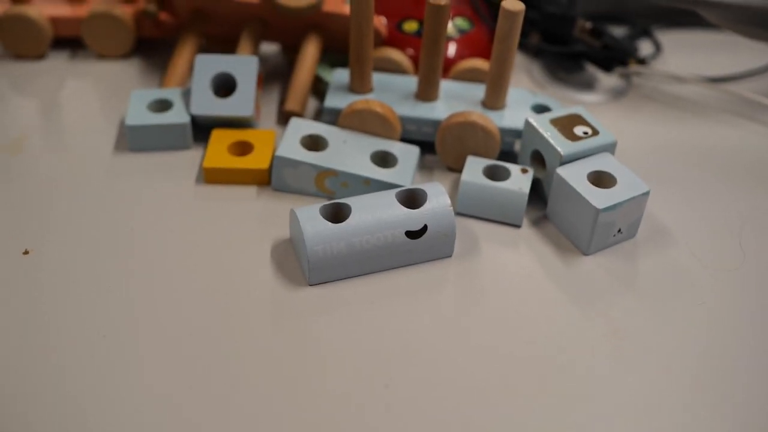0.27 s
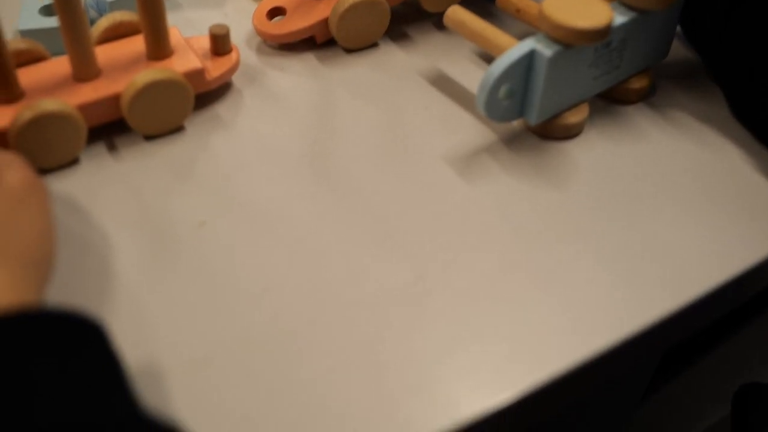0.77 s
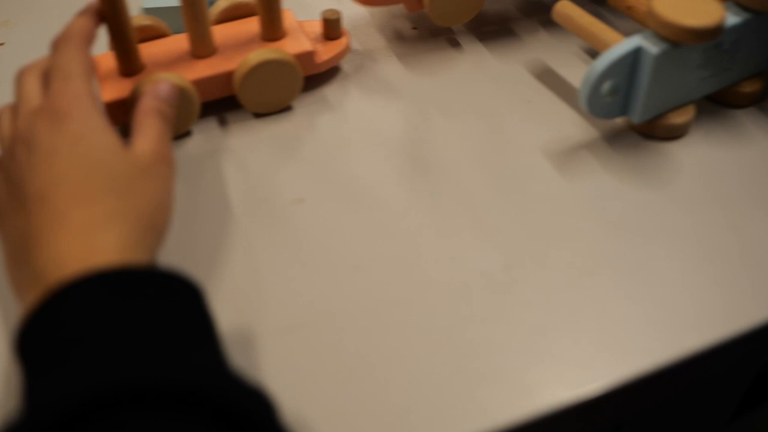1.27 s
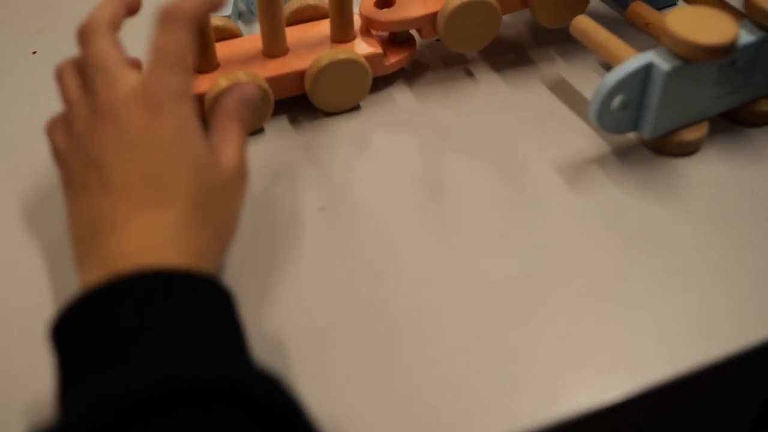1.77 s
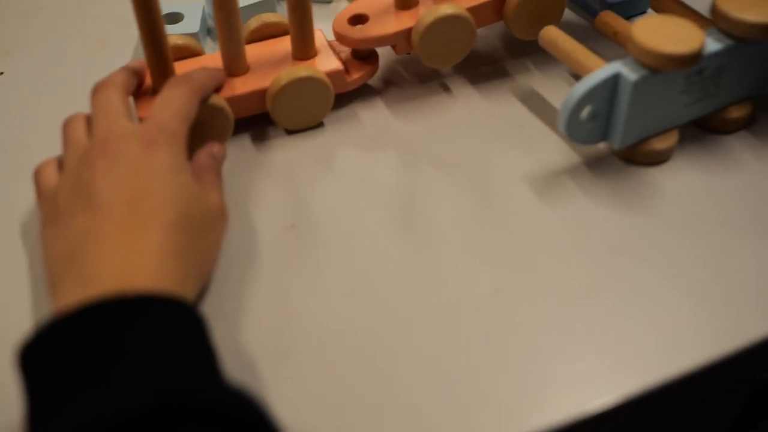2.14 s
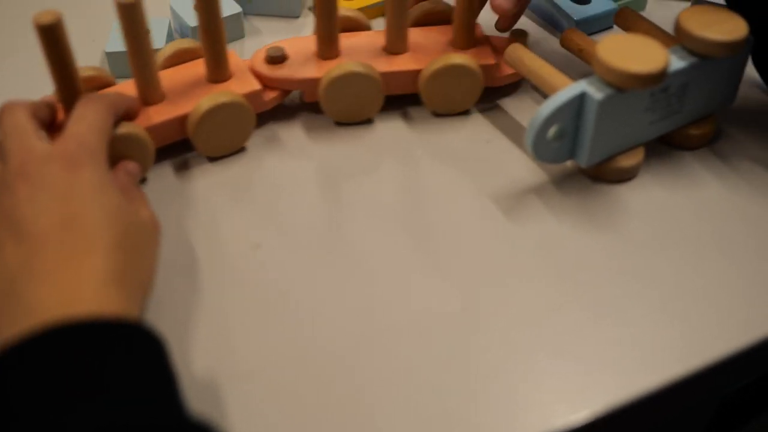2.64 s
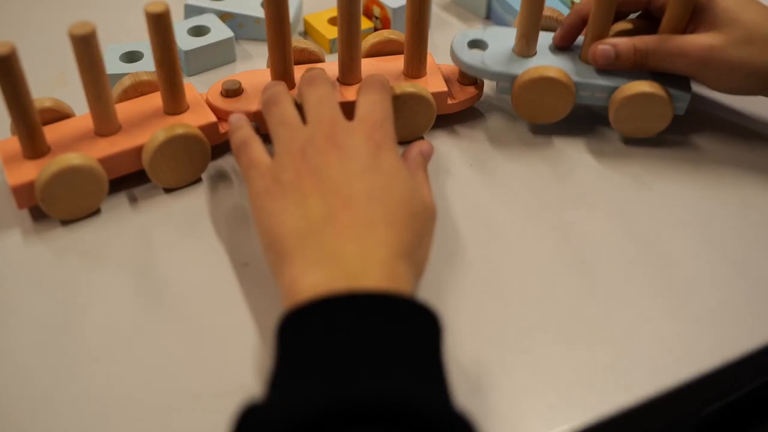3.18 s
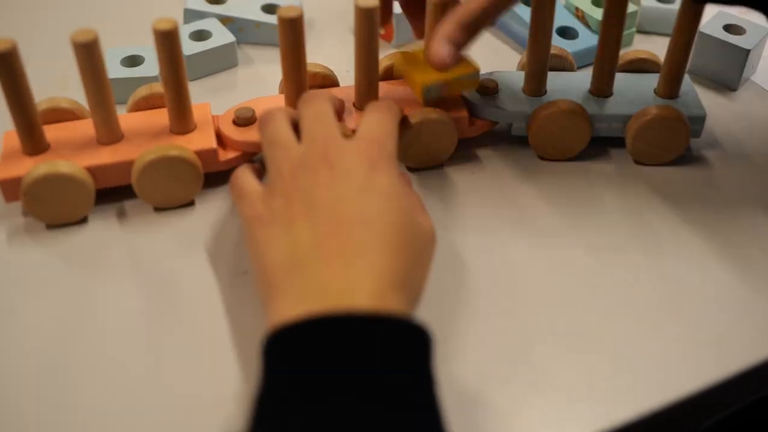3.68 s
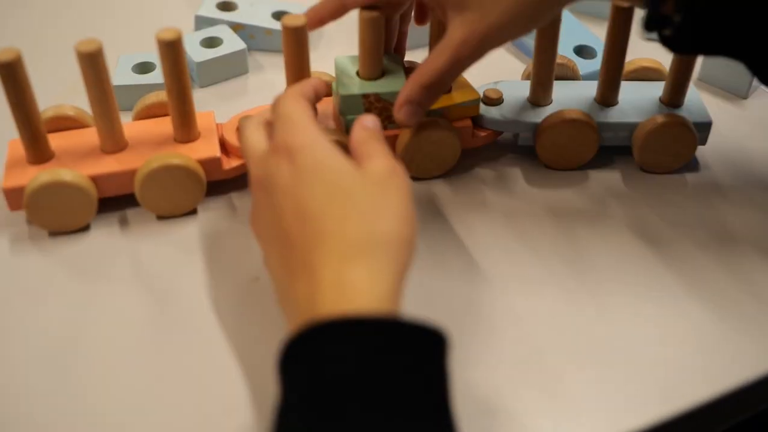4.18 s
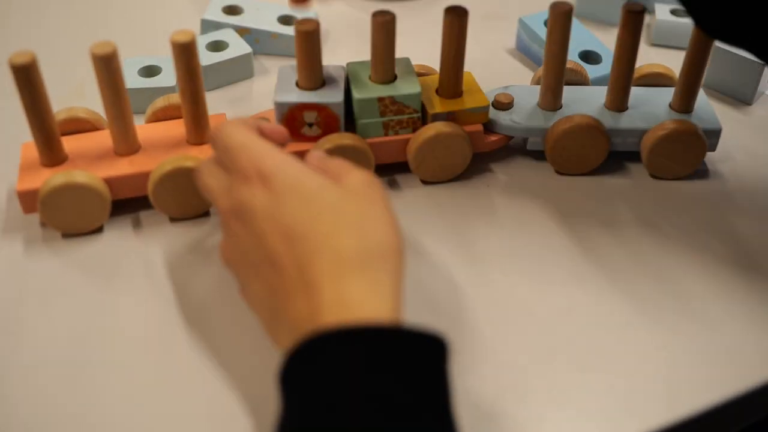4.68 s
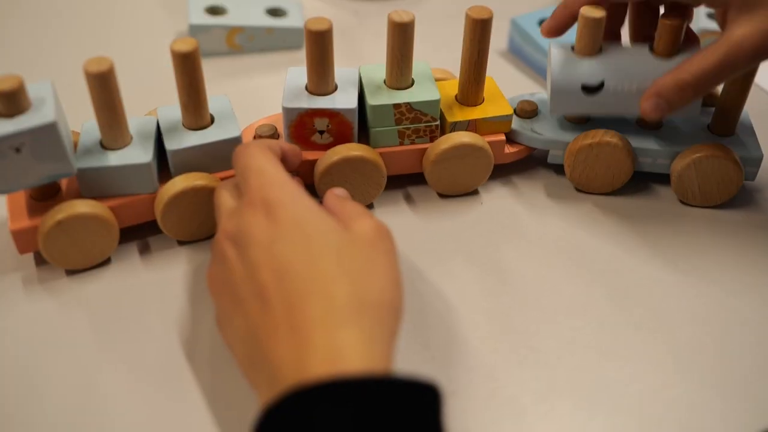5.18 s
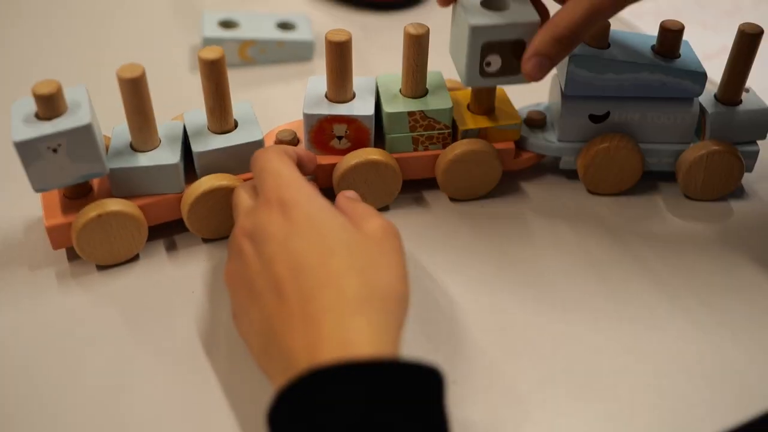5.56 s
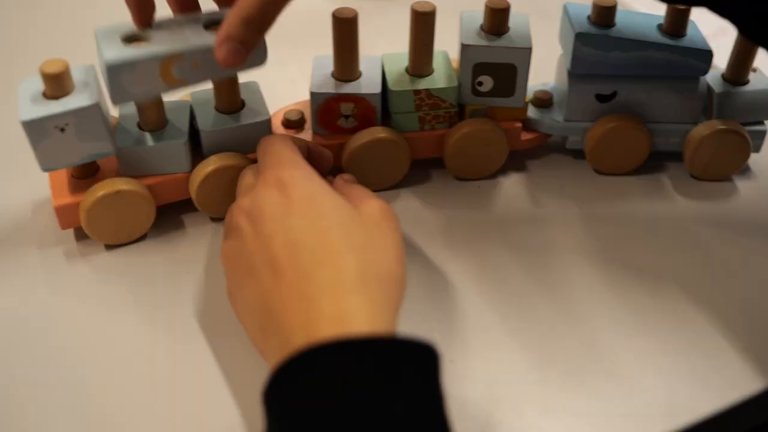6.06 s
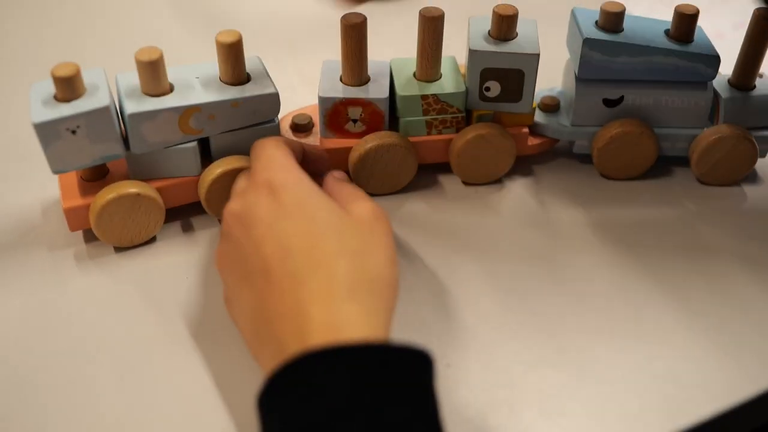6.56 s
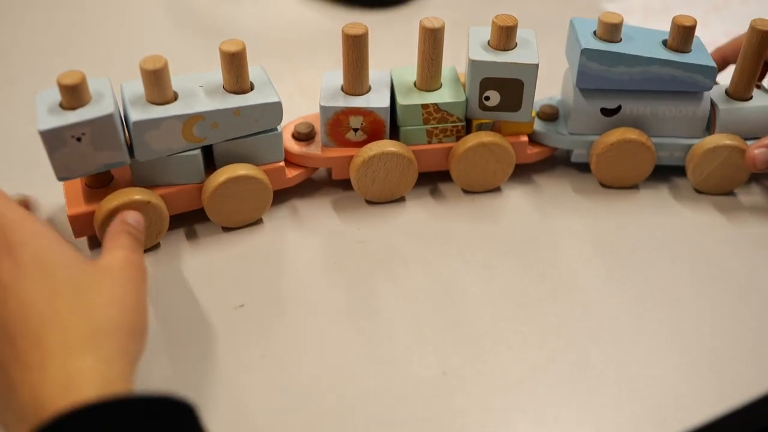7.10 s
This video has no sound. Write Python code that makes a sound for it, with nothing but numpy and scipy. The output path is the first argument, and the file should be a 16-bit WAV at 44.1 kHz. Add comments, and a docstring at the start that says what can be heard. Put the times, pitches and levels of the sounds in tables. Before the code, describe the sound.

A quiet indoor room with steady low ventilation rumble, faint hum and airy hiss, heard close to a tabletop. At the very start there is a tiny crackling click; around 0.5-1.0 s small ticks, soft sleeve brushing and dull, faint table bumps. A light wooden tap comes at 1.8 s and a hollow knock at 2.06 s. Wagons couple with quick knocks around 2.5 s, then a loud, dense clatter at 2.7-2.8 s. Softer coupling taps follow at 3.2-3.55 s. Blocks land with crisp, bright clacks at 3.84, 4.3 and 4.7 s, the last a rapid double hit. Light scuffs lead to a faint wavering rub-squeak from 5.14 s, ending in a solid woody clack at 5.36 s. A loud, sharp clack strikes at 5.77 s, another at 6.25 s, each with short room echo. Soft brushing and one tiny tap near 7.2 s close it.

```python
"""Tiny clicks, dragging crackles and soft brushing over a low rumble open the scene in a quiet room.
Then a wooden toy train clatters together: wagons are nudged and coupled, blocks slide down pegs and clack.
Each contact is damped noise plus ringing modes, and thumps the modes of the table top.
Catches through resonances squeak on the pegs; noise bursts scuff; decaying noise makes the room's echoes.
Shaped noise and a wavering two-tone hum form the ventilation bed."""
import sys
import numpy as np
from scipy import signal
from scipy.fft import rfft, irfft, next_fast_len
from scipy.io import wavfile
from scipy.ndimage import uniform_filter1d, minimum_filter1d, map_coordinates

SR = 44100
rng = np.random.default_rng(int(sys.argv[2]) if len(sys.argv) > 2 else 0)


def waveform_to_disk(signal):
    """Save audio, clipped to [-1, 1], as 16-bit WAV at the path in sys.argv[1]."""
    frames = np.transpose(np.atleast_2d(signal))
    scaled = np.clip(frames, -1, 1) * 32767
    samples = np.round(scaled).astype(np.int16)
    wavfile.write(sys.argv[1], SR, samples)


N = 323253

# Wood meeting wood: (time [s], knock level [dB], treble snap re knock [dB],
# lag of the second edge [s], 0 when the piece lands flat)
CONTACTS = [(1.81, -35.5, -26, 0), (2.0573, -26, -45, 0.00046), (2.295, -44.5, -20.5, 0.0016),
            (2.346, -50, -25, 0.00052), (2.462, -23.5, -16.5, 0.0014), (2.501, -22.5, -24.5, 0.0033),
            (2.511, -20.5, -29.5, 0.0063), (2.682, -38, -22.5, 0.0028), (2.7, -17, -24.5, 0),
            (2.71, -16.5, -26, 0), (2.725, -10.5, -26, 0.0013), (2.7273, -10, -16.5, 0.00062),
            (2.7583, -15, -20.5, 0.0014), (2.773, -21.5, -25, 0), (2.789, -23, -27, 0),
            (2.800, -27.5, -30, 0.011), (3.188, -44, -18, 0.00055), (3.2045, -28, -21, 0.0035),
            (3.337, -41, -18.5, 0), (3.4843, -29.5, -22, 0.0047), (3.5, -34.5, -19.5, 0.0066),
            (3.543, -23.5, -28, 0), (3.556, -28, -28.5, 0.0083), (3.8302, -33.5, -7, 0.00095),
            (3.8435, -18.5, -1, 0.0064), (3.887, -27.5, -19.5, 0), (3.9117, -33, -9, 0.000084),
            (4.267, -25, -9, 0.00036), (4.2992, -25.5, -0.5, 0.00042), (4.344, -42.5, -24, 0.0021),
            (4.6817, -21, 1, 0.00051), (4.709, -22.5, -21.5, 0.00077), (4.711, -11.5, -5.5, 0.0014),
            (4.728, -23.5, -16, 0), (4.7431, -30.5, -17, 0), (4.7472, -20, -12.5, 0.0021),
            (5.3504, -17.5, -22, 0.0014), (5.362, -11, -13.5, 0.000039), (5.382, -18.5, -25, 0.0073),
            (5.7726, -10, 1, 0), (5.787, -26, -6, 0.0026), (6.234, -24, -16, 0.00018),
            (6.25, -16.5, 0.5, 0), (7.178, -50.5, -6.5, 0.012)]

# Each piece is a pair: dense, quickly damped modes (frequency [Hz], level [dB]),
# then modes that ring on (frequency [Hz], width [Hz], spectral peak [dB]).
# A RIM is a cube catching on its peg before it lands.
WHEELS = ([(290, -11.5), (500, 0), (755, -19), (1530, -4.5), (2280, -25.5), (3130, -29.5), (3820, -41),
           (4090, -38.5), (12000, -44), (15600, -82.5)], [(950, 110, 5), (1220, 24, -7.5),
           (1280, 34, -11.5), (1490, 17, -11.5)])
HITCH = ([(290, -31), (450, -1.5), (720, -11.5), (1200, -4.5), (1550, -1), (1900, -14.5), (2300, -15),
          (3150, -10), (3700, -23), (5000, -31), (6800, -24), (8000, -36), (14000, -47)], [(1580, 36, 3.5),
          (3130, 77, -2), (6740, 250, -17.5)])
COUPLER = ([(290, -24.5), (500, -7), (800, -1), (1250, -2), (1650, -1), (2150, -9.5), (2850, -6),
            (3300, -14.5), (4200, -32.5), (14000, -50.5)], [(820, 55, 0), (1270, 60, 0), (1750, 78, 0),
            (2800, 130, -2)])
WAGON = ([(290, -37), (500, -11), (950, -3), (1100, -2.5), (1700, 4), (2070, -1), (2500, 1.5), (2860, -2),
          (3190, 0), (3550, -12), (4280, -15), (8240, -35.5), (9480, -35.5), (14000, -41)],
          [(979, 21, -4.5), (1336, 11, 5.5), (1610, 48, 3), (1772, 44, -0.5), (1928, 50, 0.5),
          (2300, 60, -2.5), (2760, 90, -6.5), (9660, 350, -23)])
CHASSIS = ([(290, -52), (500, -7), (998, -6), (1250, 5.5), (2070, -4.5), (2780, -3), (3930, -43),
            (4370, -43), (12000, -38), (15600, -73)], [(1290, 140, -20), (1566, 28, 6), (2850, 82, -8),
            (3770, 120, -9.5)])
ENGINE = ([(290, -30.5), (500, -14), (670, -3.5), (775, -7), (874, -3.5), (2340, -7), (3880, -25.5),
           (4860, -36), (5480, -38), (12000, -46), (15600, -75)], [(870, 49, -9), (1214, 26, 13.5),
           (1613, 73, 4), (2366, 56, -5), (3734, 100, -16)])
SLAB = ([(350, -17), (600, -23.5), (668, -8), (1210, -16), (1650, 4), (2340, 2.5), (2750, 0.5), (3700, 3),
         (4120, -7), (6960, -10.5), (9620, -10), (15000, -36)], [(3000, 240, 11), (7090, 260, 7.5),
         (9890, 120, -10)])
GREEN_CUBE_RIM = ([(600, -23), (1050, -24), (1900, -9), (2700, -4), (3600, -12), (8000, -16),
                   (14000, -31.5)], [(2640, 88, 0), (3040, 59, 7.5), (10900, 300, -10.5)])
GREEN_CUBE = ([(350, -51), (600, -21.5), (1060, -21), (1990, -5.5), (2640, -6), (3100, -9), (4520, -17.5),
               (6690, -2.5), (8290, -3.5), (13800, -8), (15000, -19)], [(1988, 160, 3.5), (3056, 88, 3),
               (6880, 230, 3), (9700, 420, -0.5), (10960, 190, -5)])
RED_CUBE_RIM = ([(350, -13.5), (600, -7.5), (900, -15), (1600, -2), (2200, -4), (3000, -0.5), (3500, -11),
                 (5200, -17), (6700, -13), (8000, -1.5), (9500, -3), (11000, -17), (15000, -24.5)],
                 [(1580, 130, 3), (3080, 73, 3), (9300, 300, 2)])
RED_CUBE = ([(350, -34), (600, -22.5), (1000, -18), (1560, -8), (2000, -5), (2600, -1), (3600, -4),
             (4060, -9.5), (4800, -12), (5460, -5), (6400, -8.5), (7400, -5.5), (9200, -8), (15000, -32)],
             [(1620, 81, -4), (2546, 130, 2), (3096, 55, 9), (3620, 140, -2), (5500, 320, -7),
             (9400, 300, -5)])
BOILER = ([(350, -19), (600, -10), (948, -10), (1310, -6), (1700, -2), (2100, -6), (2710, 1), (3360, -18.5),
           (3750, 0), (4400, -23), (7060, -20.5), (10000, -27.5), (15000, -47)], [(1200, 43, 0.5),
           (1640, 90, -1.5), (1926, 130, 3), (2620, 160, 5), (3730, 131, -5)])
TALL_CUBE = ([(350, -32.5), (600, -18.5), (1290, -14.5), (1540, -7.5), (2000, -10.5), (2340, -6),
              (2900, -4), (3550, -6.5), (3850, -10), (4400, -9.5), (5100, -12.5), (6000, -8), (9800, -5.5),
              (11200, -10), (12400, -9), (15000, -23.5)], [(1580, 90, -6.5), (1930, 86, -1),
              (2580, 109.5, -4.5), (3000, 89, -3.5), (3530, 70, -1), (4374, 150, -4.5), (6800, 200, -4.5),
              (9560, 220, 2)])
BEAM = ([(350, -25), (600, -8), (1440, -8), (1720, -4), (2220, -7), (3190, 0), (4170, -10), (4770, -6.5),
         (6600, -7), (7450, -0.5), (8700, -6), (9600, -1.5), (12100, -16), (15000, -18)], [(1600, 59, 9.5),
         (1807, 84, 2.5), (2470, 78, 7.5), (3220, 87, -7), (3450, 120, 4), (5073, 130, -10), (6200, 130, 2),
         (7230, 183, -11), (9400, 170, -3.5)])

# The piece in hand: (start [s], its sound [pair above], left minus right [dB],
# table thump at a 0 dB knock [dB], near reflections [dB], room tail [dB], ringing re dense modes [dB])
HANDLED = [(0, HITCH, 0, -19, -6, -19, -16), (2.0, WHEELS, 1, -20, -6, -23, -1),
           (2.25, HITCH, -0.5, -18, -6, -20.5, -5), (2.49, COUPLER, -0.5, -23.5, -5, -20, -8),
           (2.62, CHASSIS, -1, -21, -8.5, -17, -8), (2.72, WAGON, -0.5, -20.5, -10, -14, -6),
           (3.1, CHASSIS, -3.5, -31.5, -5, -21, -6.5), (3.27, ENGINE, -2, -20, -4, -17, -7),
           (3.7, SLAB, 0.5, -27.5, -9, -21.5, -8), (4.2, GREEN_CUBE_RIM, 1.5, -31, -7.5, -19.5, -2),
           (4.29, GREEN_CUBE, 0, -31, -11.5, -22.5, -4.5), (4.55, RED_CUBE_RIM, 2, -22.5, -7.5, -23, -4),
           (4.7, RED_CUBE, 0.5, -23.5, -10.5, -19, -4.5), (4.88, BOILER, -2, -18.5, -7.5, -17.5, -8),
           (5.6, TALL_CUBE, 1, -27, -13, -14, -4.5), (6.1, BEAM, 1, -19.5, -7, -18.5, -4.5)]
# Moments when the clatter of pieces already struck stops short, reflections included: (time [s])
RING_STOPS = [3.218, 4.9, 5.5]
# Modes of the table top: (frequency [Hz], width [Hz], spectral peak [dB])
TABLE_TOP = [(190, 37, -4.5), (227, 24, -3), (307.2, 16, 1.5), (370.5, 34, 0), (419, 60, -3),
             (520, 110, -12.5), (650.4, 39, -10)]

SECOND_EDGE_DB = 1  # a tilted piece's second edge, re its first
# a settling piece: mean time between touches, first touch re the contact, loss a touch
CHATTER_S, CHATTER_DB, CHATTER_LOSS_DB = 0.0092, -22.5, 1
# the grip detunes each mode (share); all round, the modes stand out less (dB)
MODE_SCATTER, ALL_ROUND_DB = .003, -5
THUMP_GROWS = 0.46  # table thump, dB per dB of knock
REBOUND_DB, SETTLE_S = -6, .1  # a rebound thumps less; it follows another contact within this time

# Resonances of a block squeaking on its pegs:
# (frequency [Hz], width [Hz], level at the top [dB], gain on the way down [dB])
PEGS = [(1790, 110, -2, 9), (2800, 170, 0, -6), (6600, 600, -14, 3.5)]
# the boiler rubs down its pegs: start, end and fades, then level
SLIDE_FROM_S, SLIDE_TO_S, SLIDE_FADE_S, SLIDE_DB = 5.135, 5.36, 0.029, -54
# pitch lost and its waver (shares), unevenness (dB), catches a second
SLIDE_SAG, SLIDE_WAVER, SLIDE_JERK_DB, SLIP_RATE = 0.07, 0.036, 3, 900

# Fingers and wood brush a piece: (time [s], level [dB])
SCUFFS = [(0.672, -38.5), (0.955, -49), (1.947, -49.5), (2.02, -46.5), (2.335, -43.5), (3.787, -39),
          (3.8266, -32.5), (4.62, -44.5), (4.9, -40.5), (4.973, -43.5), (5.041, -43), (5.156, -43),
          (5.6, -44), (5.72, -42), (6.14, -40.5), (7.202, -50.5), (7.285, -46)]
# Colour of the scuffs: (frequency [Hz], level [dB])
SCUFF_TONE = [(150, -15.5), (400, 7.5), (800, -1), (1400, -1.5), (2000, -10), (3000, -14.5), (4500, -27),
              (9000, -25.5), (15000, -38.5)]
# An arm or a heavy block shakes the table: (time [s], level [dB], pitch re the frame's modes [ratio])
BUMPS = [(0.672, -31.5, 0.88), (0.689, -33, 1.12), (0.957, -33.5, 0.75), (5.361, -36.5, 1.16)]
# Modes of the whole table: (frequency [Hz], width [Hz], spectral peak [dB])
FRAME = [(82, 20, -8.5), (112, 33, -7), (143.5, 34, 3.5), (207, 17, -0.5), (268, 37, -7), (410, 480, -18.5)]
# Tiny clicks: (time [s], level [dB], frequency [Hz], width of each of two filter passes [Hz])
TICKS = [(0.044, -40, 10300, 2400), (0.045, -45, 7100, 1400), (0.473, -41, 1820, 219),
         (0.551, -35.5, 4420, 754), (0.953, -47, 1800, 1500), (3.788, -35, 1800, 600),
         (5.521, -54, 3000, 4000), (6.126, -49, 9030, 2800), (6.492, -57, 9575, 3994)]
# Skin and wood drag over lacquer:
# (middle [s], length [s], level [dB], frequency [Hz], width of each of two filter passes [Hz])
CRACKLES = [(0.03, 0.074, -61, 7050, 4000), (0.045, 0.051, -48.5, 7800, 4030),
            (0.482, 0.061, -55, 3800, 800), (0.69, 0.06, -51, 2750, 400), (2.135, 0.14, -59, 3800, 800),
            (2.306, 0.09, -60.5, 3080, 300), (2.32, 0.089, -63, 8000, 4000)]
CRACKLE_RATE = 900  # grains a second

# Arm movements, cloth and skin brushing the table: (middle [s], length [s], level [dB])
STROKES = [(0.485, 0.54, -60.5), (0.997, 0.77, -59.5), (1.8, 0.45, -61.5), (2.302, 0.99, -63.5),
           (6.88, 0.49, -63.5), (7.226, 0.32, -61.5)]
# Colour of the brushing cloth: (frequency [Hz], level [dB])
CLOTH = [(600, 14.5), (1200, 7.5), (2500, 8.5), (4500, 7), (7000, -0.5), (10000, 4), (15000, -11)]

# Reverb time of the room's tail: (frequency [Hz], t60 [s])
ROOM = [(200, 0.97), (1000, 0.69), (3500, 0.64), (7000, 0.54), (11000, 0.26), (15000, 0.14)]
# Colour of the room's tail: (frequency [Hz], level [dB])
ROOM_TONE = [(700, 3.5), (1500, 1), (2400, -5), (4500, 1), (10000, -0.5)]
# Bands that stand out in the tail: (frequency [Hz], width [Hz], level [dB])
LINGER = [(1580, 60, -3), (3090, 60, -4), (3600, 70, 3), (4320, 80, 4.5), (5700, 500, -6)]
# Width of the reflections: (frequency [Hz], side re mid [dB])
SPREAD = [(200, -34.5), (700, -8), (2000, -7), (12000, -4)]
LINGER_T60 = 0.88  # decay of the lingering bands (s)
WALL_S, WALL_DB = .042, -24.5  # a wall throws sound back: delay, level re the direct sound

# Spectrum of the ventilation rumble: (frequency [Hz], level [dB])
RUMBLE = [(12, -73), (20, -55), (38, -54.5), (65, -28.5), (97, -15.5), (115, -19), (134, -3.5), (209, -7),
          (240, -2.5), (305, -10.5), (344, -10.5), (437, -19.5), (476, -23), (694, -22), (1200, -38.5),
          (1560, -66), (2640, -120)]
# Tones of the hum: (frequency [Hz], level [dB])
HUM = [(120, -64), (240, -55)]
# Spectrum of the hiss: (frequency [Hz], level [dB])
HISS = [(590, -18), (1000, -2.5), (1620, -3.5), (1770, -6.5), (2560, -8.5), (3370, -9.5), (4600, -13),
        (9800, -11.5), (15500, -21)]
# ventilation: level, size of its waver, knots of the waver curve a second
RUMBLE_DB, RUMBLE_WAVER_DB, RUMBLE_WAVER_RATE = -44.5, 1.5, 5
TOP_HZ = 15900  # upper band limit


def train():
    """Pieces clatter at their own places; heavy pieces and first landings thump the table most."""
    out, top = np.zeros((2, N)), np.zeros(N)
    t = np.arange(SR) / SR
    ends = [row[0] for row in HANDLED[1:]] + [N / SR]
    for handled, end in zip(HANDLED, ends):
        start, piece, pan_db, weight_db, early_db, late_db, ring_db = handled
        track = np.zeros((2, SR))  # heard from the front, heard from all round
        blows = [row for row in CONTACTS if start <= row[0] < end]
        first = min(row[0] for row in blows)
        for s, knock_db, snap_db, lag in blows:
            for when, db in touches(s, knock_db, lag):
                add(track, when - first, clack(piece, db, snap_db, ring_db))
            rebound = any(0 < s - row[0] < SETTLE_S for row in blows)
            thump_db = weight_db + THUMP_GROWS * knock_db + REBOUND_DB * rebound
            add(top, s, amp(thump_db) * thump())
        stop = min([s for s in RING_STOPS if s > blows[-1][0]] + [N / SR])
        front, all_round = track
        fade = np.clip((stop - first - t) / 0.0035, 0, 1)
        heard = in_room(front, early_db, late_db, all_round) * fade
        add(out, first, heard * amp([[pan_db / 2], [-pan_db / 2]]))
    return out + in_room(top, early_db=0.0, late_db=-9.5)


def clack(piece, knock_db, snap_db, ring_db, crack_t60=0.015, split_hz=4600):
    """One contact, from the front and from all round: the wood knocks and a hard edge adds treble."""
    spectrum, modes = piece
    noise = [burst(crack_t60), burst(crack_t60)]
    crack = signal.fftconvolve(noise, causal(spectrum)[None], axes=1)[:, :SR // 4]
    gripped = [(hz * (1 + MODE_SCATTER * rng.standard_normal()), width, db) for hz, width, db in modes]
    tone = struck(ring(gripped))
    ringing = amp([[ring_db], [ring_db + ALL_ROUND_DB]]) * tone
    wood = edge(struck(crack) + ringing, 390, "high", order=2)
    knock = struck(edge(wood, split_hz, "low", order=4))
    snap = struck(edge(wood, split_hz, "high"))
    return amp(knock_db) * (knock + amp(snap_db) * snap)


def touches(s, knock_db, lag, count=2):
    """(time, dB) of one landing: first edge, second edge if tilted, then fading chatter."""
    edges = [(s, knock_db)]
    if lag > 0:
        edges.append((s + lag, knock_db + SECOND_EDGE_DB))
    times = s + lag + CHATTER_S * np.cumsum(.5 + rng.random(count))
    levels = knock_db + CHATTER_DB - CHATTER_LOSS_DB * np.arange(count)
    return edges + list(zip(times, levels))


def thump(place_db=3):
    """The table top answers, each spot with its own mix of modes; being thin, it radiates little bass."""
    modes = [(hz, width, db + place_db * rng.standard_normal()) for hz, width, db in TABLE_TOP]
    return struck(edge(ring(modes), 150, "high", order=3), seconds=.012)


def handling():
    """The squeak, scuffs, bumps and small clicks of the hands at work, each group with its own echoes."""
    return (in_room(scuffs() + squeak(), early_db=-4.5, late_db=-9.5)
            + in_room(bumps(), early_db=-3, late_db=-12.5)
            + in_room(ticks() + crackles(), early_db=-16.5, late_db=-38.5))


def squeak():
    """The boiler sticks and slips down its pegs; pitch wavers and sags, the lowest resonance takes over."""
    t = np.arange(N) / SR
    depth = np.clip((t - SLIDE_FROM_S) / (SLIDE_TO_S - SLIDE_FROM_S), 0, 1)
    # reading the resonances at an uneven pace bends their pitch
    clock = np.cumsum(1 - SLIDE_SAG * depth + SLIDE_WAVER * wobble(27))
    catches = slips(SLIP_RATE)
    rubbing = np.zeros(N)
    for hz, width, db, gained_db in PEGS:
        level = amp(db + gained_db * depth + SLIDE_JERK_DB * wobble(65))
        tone = unit(resonant(catches, [(hz, width, 0)]))
        rubbing += level * np.interp(clock, np.arange(N), tone)
    sliding = np.clip(np.minimum(t - SLIDE_FROM_S, SLIDE_TO_S - t) / SLIDE_FADE_S, 0, 1)
    return amp(SLIDE_DB) * sliding * rubbing


def scuffs():
    """Fingers and wood brush a piece: short coloured bursts of noise."""
    track = np.zeros(N)
    for s, db in SCUFFS:
        brush = signal.fftconvolve(burst(t60=0.099), causal(SCUFF_TONE))
        add(track, s, amp(db) * struck(brush))
    return track


def bumps():
    """An arm or a heavy block sets the modes of the whole table ringing."""
    track = np.zeros(N)
    for s, db, pitch in BUMPS:
        thud = edge(ring(np.multiply(FRAME, [pitch, 1, 1])), 82, "high", order=7)
        add(track, s, amp(db) * struck(thud, seconds=0.051))
    return track


def ticks():
    """Small parts tick: very short bursts through one resonance."""
    track = np.zeros(N)
    for s, db, hz, width in TICKS:
        add(track, s, amp(db) * struck(band(burst(t60=0.0011), hz, width)))
    return track


def crackles():
    """Skin and wood drag over lacquer: many tiny catches excite one resonance."""
    track = np.zeros(N)
    for s, length, db, hz, width in CRACKLES:
        grains = unit(band(slips(CRACKLE_RATE, size=SR), hz, width))
        track += swells([(s, length, db)]) * np.resize(grains, N)
    return track


def slips(rate, size=N):
    """Tiny catches of random time and size, on average rate a second."""
    return (rng.random(size) < rate / SR) * rng.standard_normal(size)


def sleeve():
    """A soft, uneven brushing that swells and fades with each movement of the arm."""
    return swells(STROKES) * amp(0.33 * wobble(11)) * air(CLOTH, side_db=-6.0)


def swells(rows):
    """A rounded rise and fall for each (middle, length, dB)."""
    t = np.arange(N) / SR
    return sum(amp(db) * np.cos(np.pi * np.clip((t - s) / length, -.5, .5)) for s, length, db in rows)


def in_room(x, early_db, late_db, all_round=None, early_t60=0.1, gap=0.0036, build_s=0.005):
    """Direct sound, reflections from table and toys, a wall's answer, a tail fed by all-round sound."""
    # tail: noise whose decay depends on frequency, plus lingering bands
    hz, t, z = signal.stft(rng.standard_normal((2, SR * 3 // 4)), SR, nperseg=256)
    decay_db = along(ROOM_TONE, hz)[:, None] - 60 * t / along(ROOM, hz)[:, None]
    late = signal.istft(z * amp(decay_db), SR, nperseg=256)[1]
    t = np.arange(late.shape[1]) / SR
    late = late + resonant(rng.standard_normal(late.shape), LINGER) * amp(-60 * t / LINGER_T60)
    late = amp(late_db) * unit(late * (1 - np.exp(-(t / build_s) ** 2)))
    early = np.pad([burst(early_t60), burst(early_t60)], [(0, 0), (0, len(t) - SR // 4)])
    early = amp(early_db) * unit(early * (1 - np.exp(-(t / gap) ** 2)))
    wall = rng.standard_normal(late.shape) * (t > WALL_S) * amp(-60 * np.abs(t - WALL_S) / early_t60)
    near = early + amp(WALL_DB) * unit(edge(wall, 6500, "low", order=2))
    feed = x if all_round is None else all_round
    near_echoes = signal.fftconvolve(x[None], near, axes=1)
    tail = signal.fftconvolve(feed[None], late, axes=1)
    echoes = (near_echoes + tail)[:, :len(x)] / np.sqrt(len(t))
    mid, side = echoes[0], filtered(echoes[1], lambda f: amp(along(SPREAD, f)))
    return x + np.array([mid + side, mid - side])


def background():
    """The quiet bed under everything: rumble, hum and faint hiss."""
    return rumble() + hum() + hiss()


def rumble():
    """Low ventilation noise whose level slowly wavers."""
    return amp(RUMBLE_DB + RUMBLE_WAVER_DB * wobble(RUMBLE_WAVER_RATE)) * air(RUMBLE, side_db=-39.0)


def hum():
    """Two sines made slightly unsteady by wandering phase."""
    t = np.arange(N) / SR
    return sum(amp(db) * np.sqrt(2) * np.sin(2 * np.pi * hz * t + 2.7 * wobble(5)) for hz, db in HUM)


def hiss():
    """Faint, steady treble noise."""
    return amp(-61.5) * air(HISS, side_db=-5.0)


def air(spectrum, side_db):
    """Coloured stereo noise of rms 1; side_db sets how much the ears differ."""
    mid, side = filtered(rng.standard_normal((2, N)), lambda hz: amp(along(spectrum, hz)))
    return unit(np.array([mid + amp(side_db) * side, mid - amp(side_db) * side]))


def burst(t60, evenness=.25):
    """Fast-decaying noise that holds all frequencies about evenly."""
    t = np.arange(SR // 4) / SR
    z = rfft(rng.standard_normal(len(t)) * amp(-60 * t / t60), SR // 2)
    power = np.abs(z) ** 2
    return irfft(z / np.sqrt(power + abs(evenness) * power.mean()))[:len(t)]


def ring(modes):
    """Damped modes, with slightly new strengths for each point of contact."""
    t = np.arange(SR // 4) / SR
    hz, width, db = np.transpose(modes)[:, :, None]
    sign = (-1) ** np.arange(len(hz))[:, None]
    size = amp(db + rng.standard_normal(hz.shape)) * width * sign
    decay = np.exp(-np.pi * np.abs(width) * t)
    return np.sum(size * decay * np.sin(2 * np.pi * hz * t), axis=0)


def resonant(x, modes):
    """x through parallel (Hz, width, dB) resonances of alternating sign."""
    def response(f):
        return sum((-1) ** k * amp(db) * 1j * f * w / (c * c - f * f + 1j * f * w)
                   for k, (c, w, db) in enumerate(modes))
    return filtered(x, response)


def band(x, hz, width):
    """One resonance passed twice for steep skirts."""
    return filtered(x, lambda f: (1j * f * width / (hz * hz - f * f + 1j * f * width)) ** 2)


def edge(x, hz, kind, order=6):
    """A low-pass or high-pass."""
    return signal.sosfilt(signal.butter(order, hz, kind, fs=SR, output="sos"), x)


def causal(spectrum, size=1024):
    """A minimum-phase impulse response: this spectrum with its energy as early as possible."""
    level_db = np.maximum(along(spectrum, np.fft.rfftfreq(size, 1 / SR)), -60)
    cepstrum = irfft(np.log(amp(level_db)))
    cepstrum[1:size // 2] *= 2
    cepstrum[size // 2 + 1:] = 0
    return irfft(np.exp(rfft(cepstrum)))


def filtered(x, response):
    """x times a response of frequency."""
    n = x.shape[-1]
    m = next_fast_len(n + SR // 8)
    return irfft(rfft(x, m) * response(np.fft.rfftfreq(m, 1 / SR)), m)[..., :n]


def along(points, hz):
    """Interpolate (Hz, value) points on a log axis."""
    f, v = np.transpose(points)
    return np.interp(np.log(hz + 1), np.log(f + 1), v)


def wobble(rate):
    """A smooth random curve, rate knots a second."""
    knots = rng.standard_normal(int(N * rate / SR) + 4)
    return map_coordinates(knots, [np.arange(N) * rate / SR])


def add(track, s, x):
    """Mix x into the track at time s."""
    part = track[..., round(s * SR):][..., :x.shape[-1]]
    part += x[..., :part.shape[-1]]


def struck(x, seconds=.004):
    """Scale a blow to rms 1 over its first moments."""
    return x / np.sqrt(np.mean(x[..., :int(seconds * SR)] ** 2, axis=-1, keepdims=True) + 1e-20)


def unit(x):
    """Scale to rms 1."""
    return x / np.sqrt(np.mean(x ** 2) + 1e-20)


def amp(db):
    """Decibels to a linear factor."""
    return 10 ** (np.asarray(db) / 20)


def scene():
    """The clacking train, the hands at work and the quiet room."""
    return train() + handling() + sleeve() + background()


def record(dry, ceiling=0.98):
    """A fast limiter holds the loudest clacks at the ceiling; a steep low-pass then sets the band limit."""
    needed = np.minimum(1, ceiling / (np.abs(dry).max(axis=0) + 1e-9))
    gain = uniform_filter1d(minimum_filter1d(needed, size=45), size=45)
    return filtered(dry * gain, lambda hz: 1 / np.sqrt(1 + (hz / TOP_HZ) ** 120))


dry = scene()
out = record(dry)
waveform_to_disk(out)
```